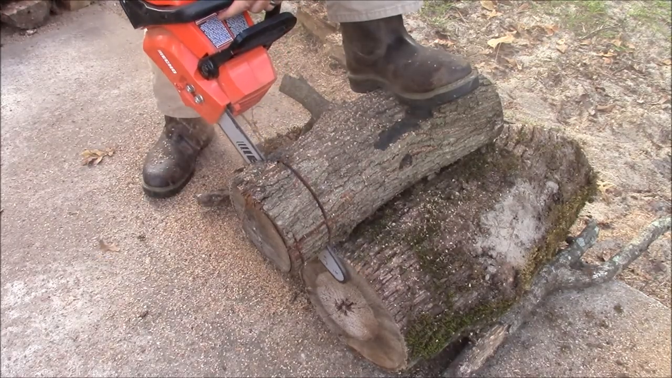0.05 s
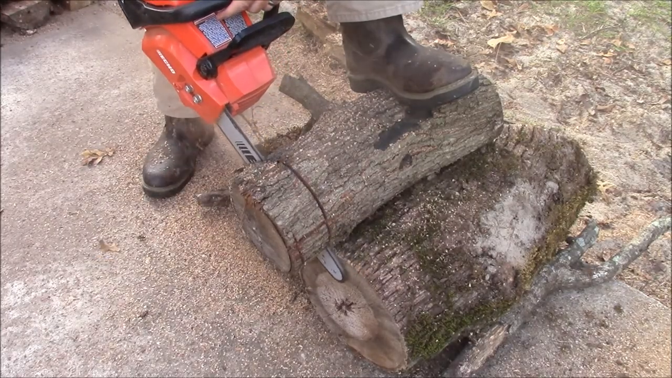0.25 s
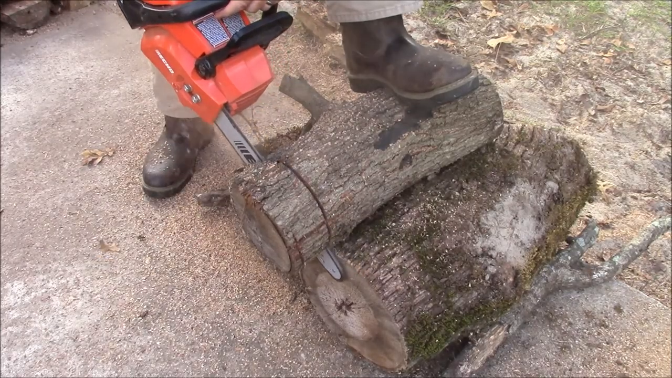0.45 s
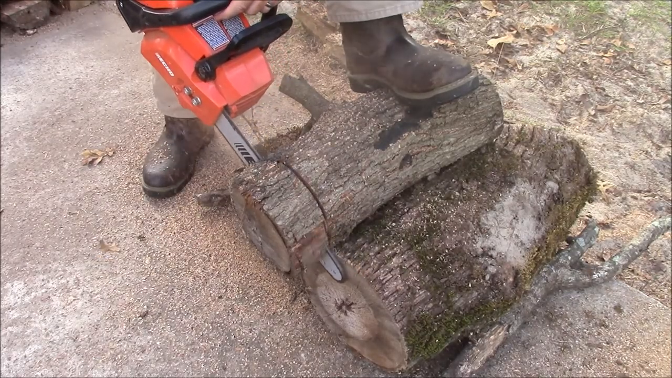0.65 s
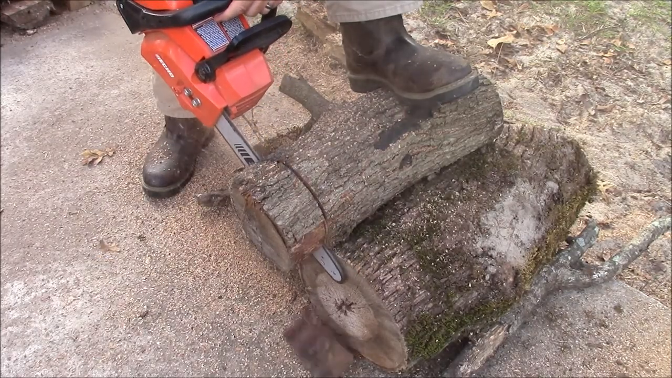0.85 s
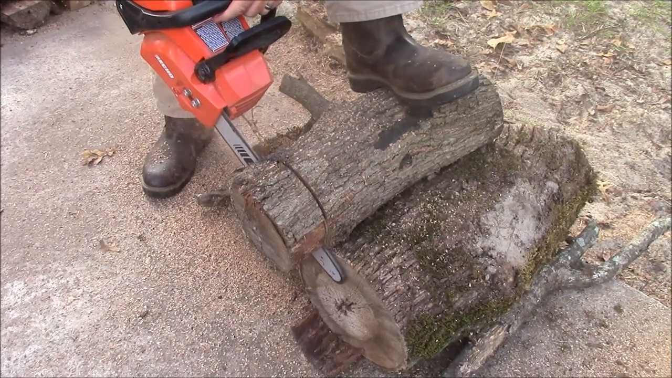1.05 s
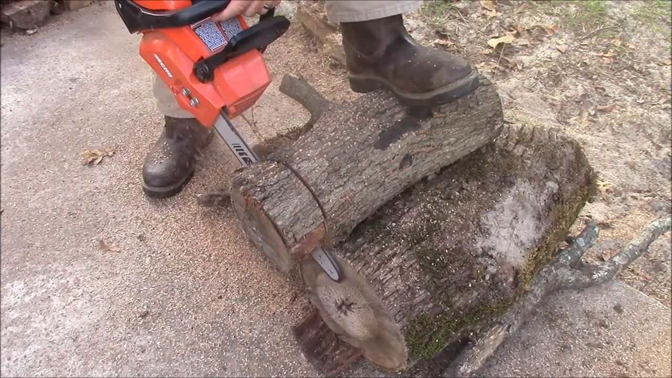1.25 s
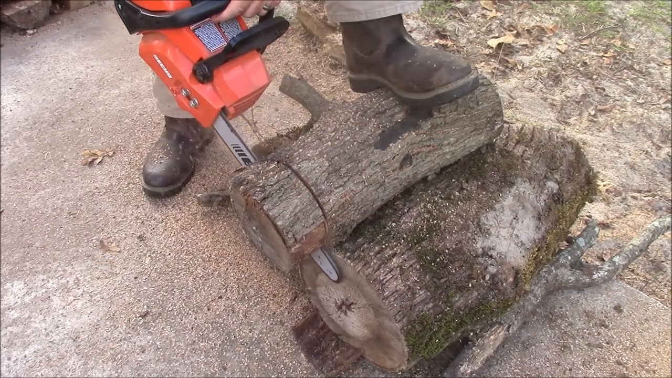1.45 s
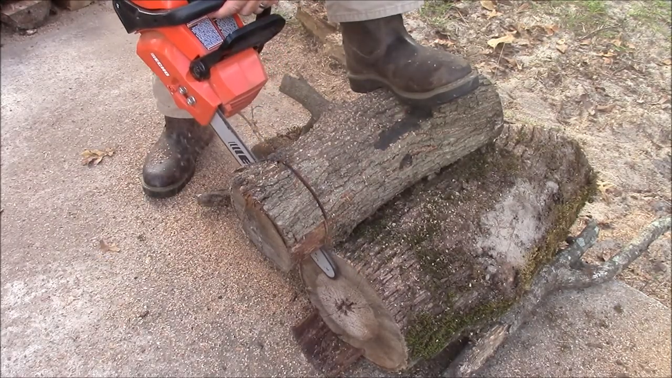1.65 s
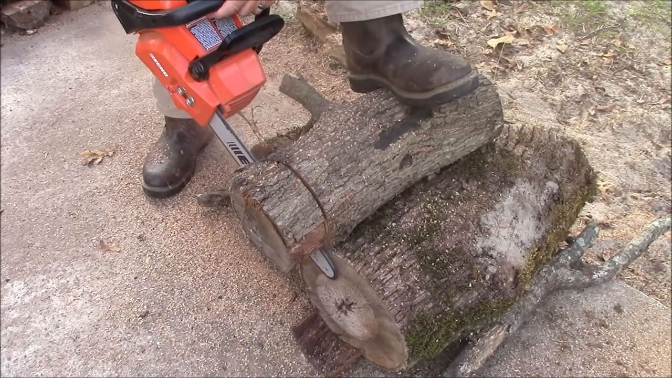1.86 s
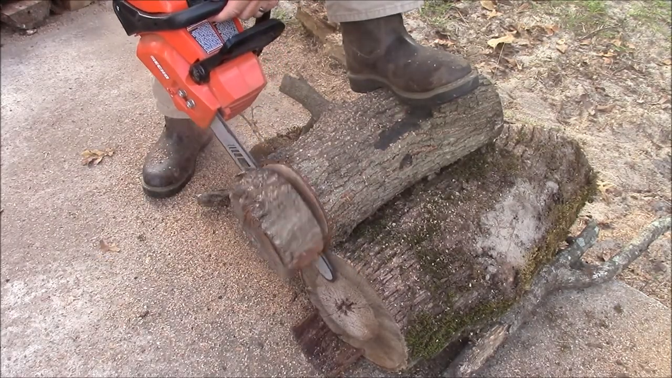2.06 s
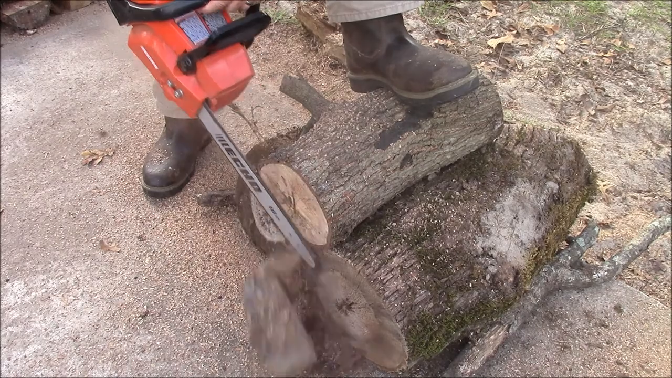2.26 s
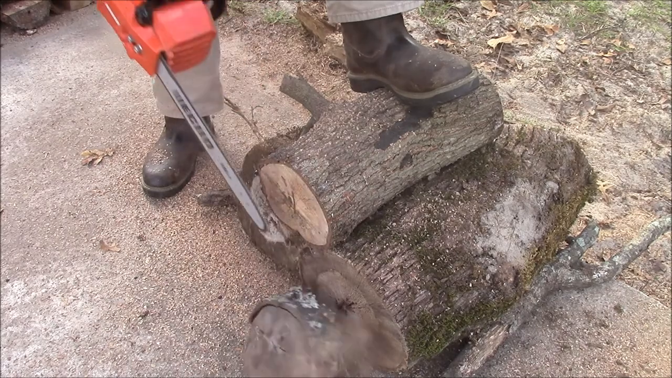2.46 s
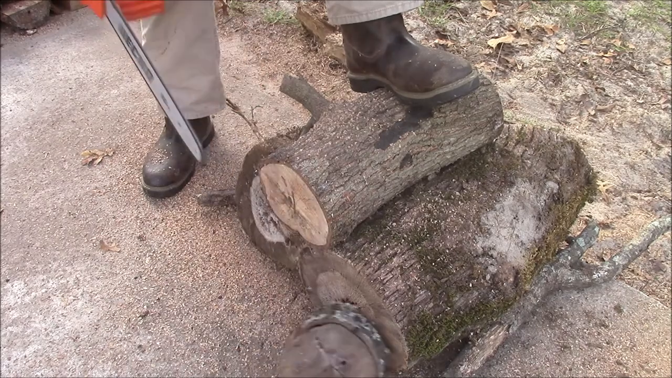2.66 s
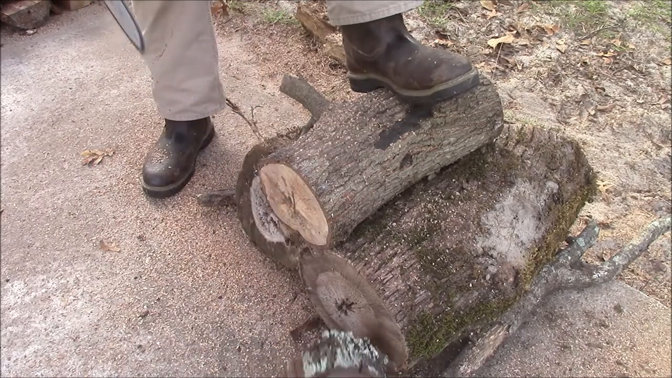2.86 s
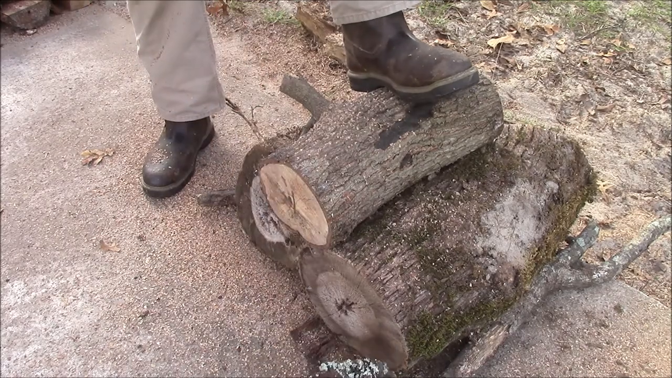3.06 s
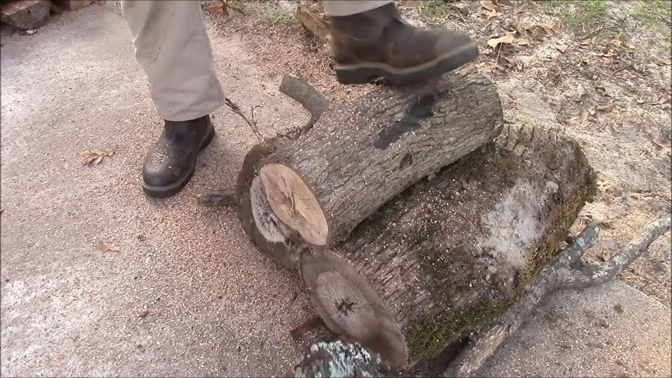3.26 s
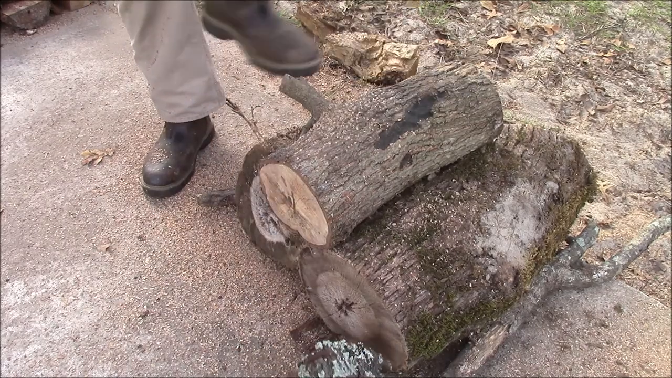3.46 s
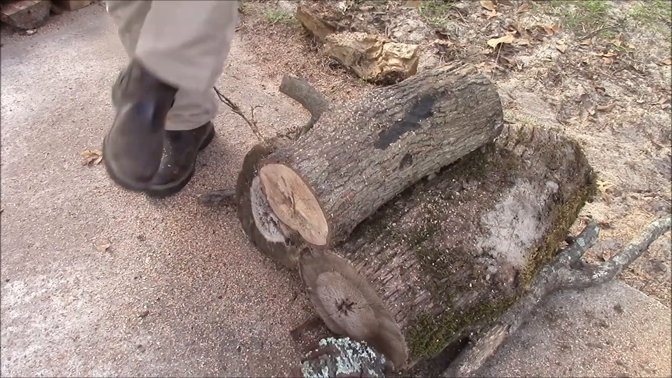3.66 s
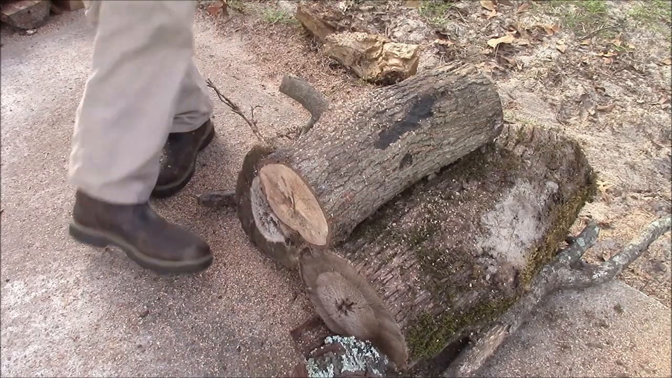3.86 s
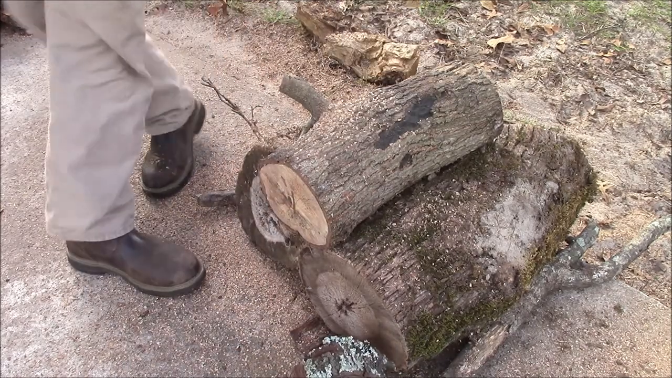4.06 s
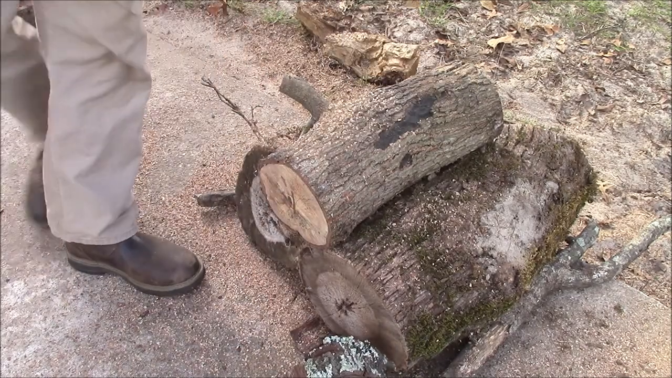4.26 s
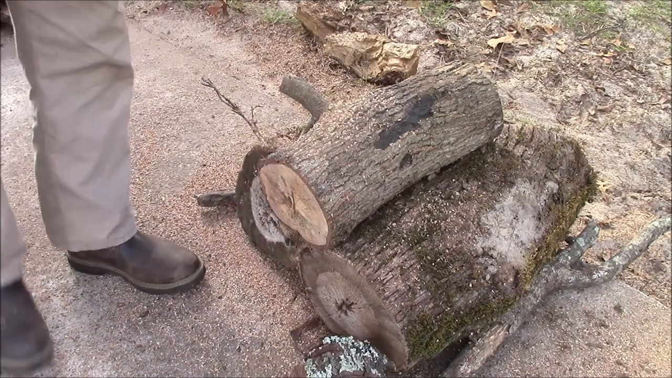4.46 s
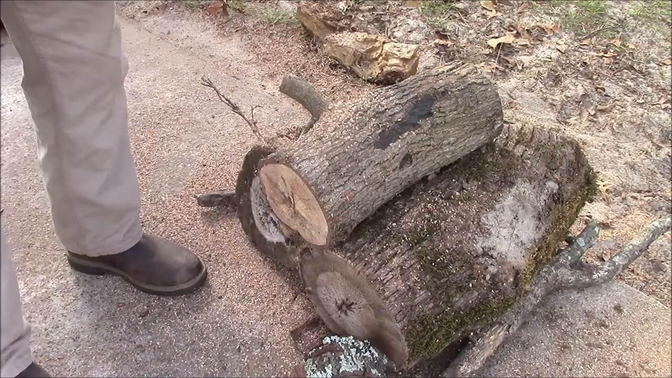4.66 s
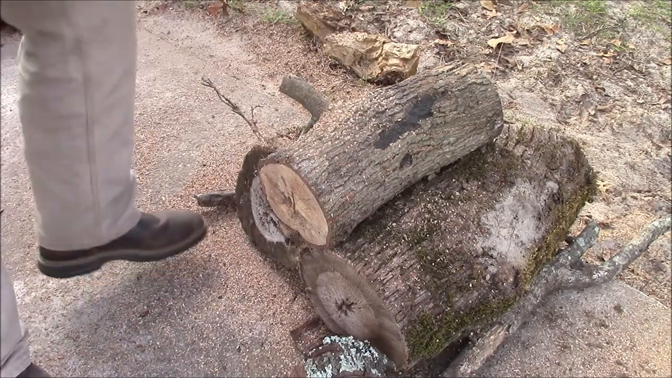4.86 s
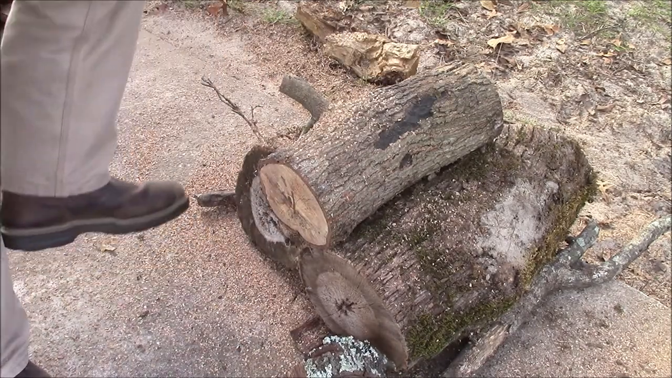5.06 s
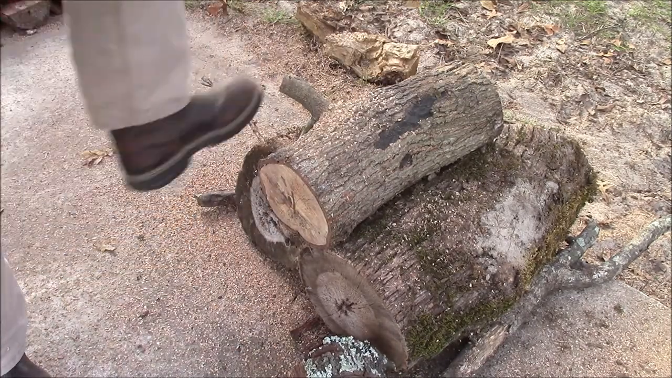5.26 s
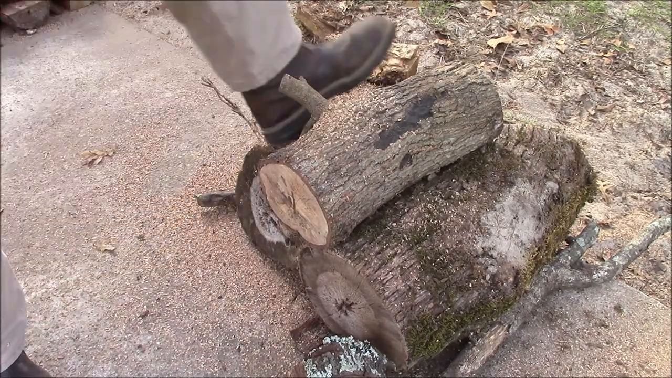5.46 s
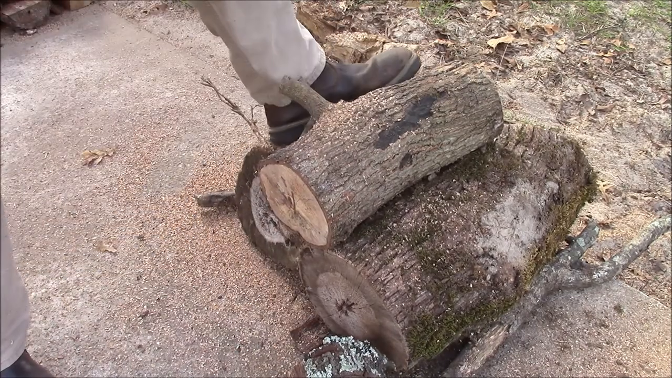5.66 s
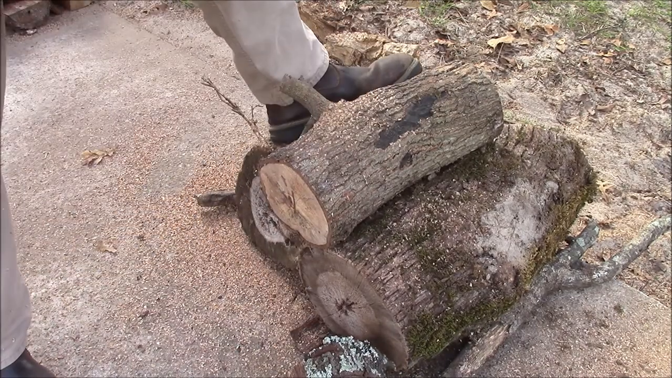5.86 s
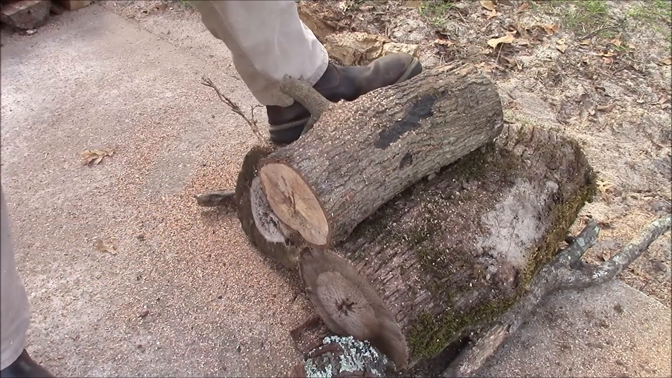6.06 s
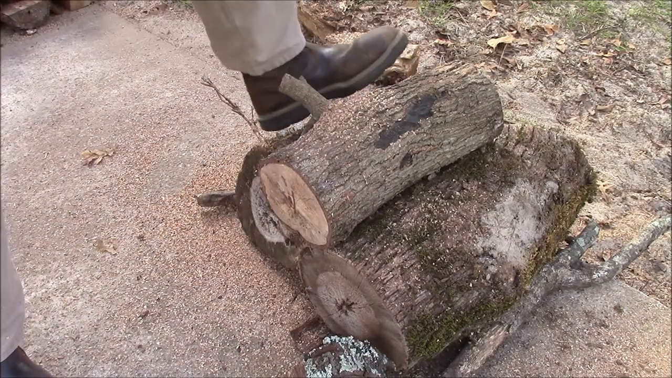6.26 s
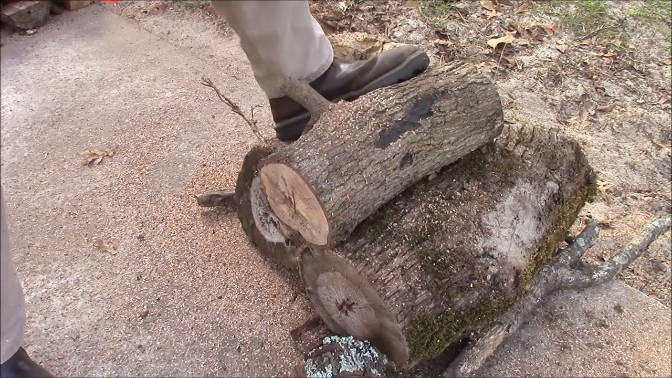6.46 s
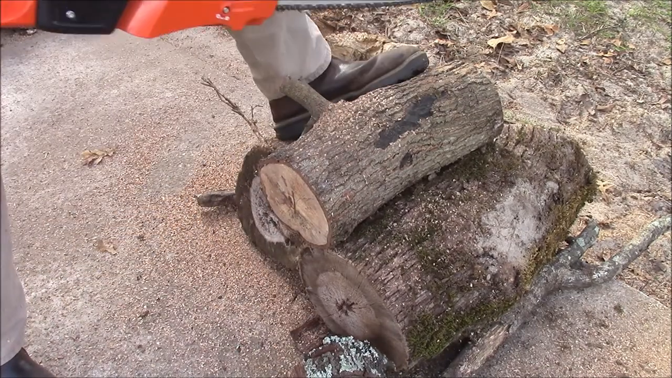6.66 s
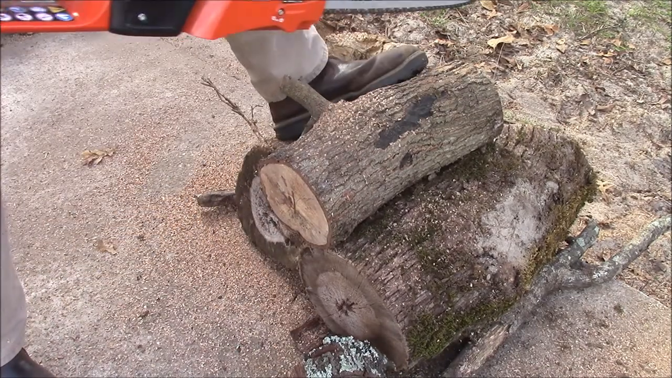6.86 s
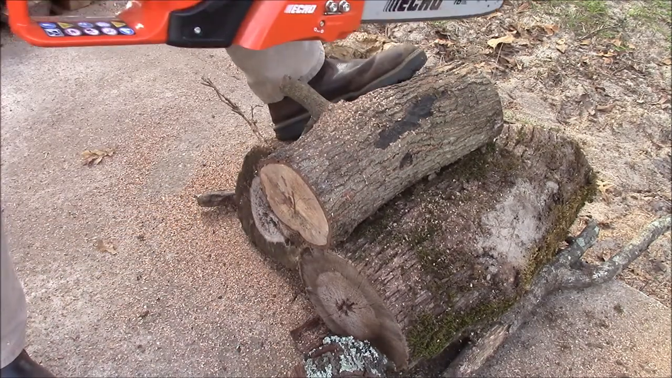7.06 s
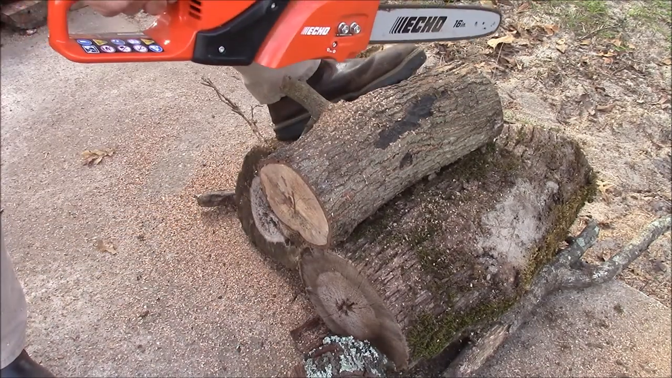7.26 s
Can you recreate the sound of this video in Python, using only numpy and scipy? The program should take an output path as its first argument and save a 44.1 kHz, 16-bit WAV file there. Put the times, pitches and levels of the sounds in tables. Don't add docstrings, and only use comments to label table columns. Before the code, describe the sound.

A battery chainsaw close to a small outdoor microphone sings with a hard electric whine and dense chain rasp, rises as the wood thins, then breaks free brighter. The pitch glides down for over two seconds until single links tick and stop. Wind thumps, twigs crack and boots scuff in the near quiet. A loud plastic click follows, then rattling links and a quickly rising whir.

```python
import sys
import numpy as np
from scipy import signal
from scipy.fft import rfft, irfft, next_fast_len
from scipy.io import wavfile
from scipy.ndimage import uniform_filter1d

SR = 44100
rng = np.random.default_rng(int(sys.argv[2]) if len(sys.argv) > 2 else 0)


def generate_wav(signal):
    frames = np.transpose(np.atleast_2d(signal))
    scaled = np.clip(frames, -1, 1) * 32767
    pcm = np.round(scaled).astype(np.int16)
    wavfile.write(sys.argv[1], SR, pcm)


def gain_from_decibels(decibels):
    exponent = np.asarray(decibels, float) / 20
    return 10 ** exponent


N = 322812

# time in seconds, speed in turns per s.
CUTTING_SPEED = [
    (0, 179),
    (.37, 180.6),
    (1.35, 179.7),
    (1.55, 184),
    (2.04, 185.1),
    (2.13, 192.5),
    (2.3, 195.3),
]
BEARING_DRAG_PER_S, FAN_DRAG = .59, .5
GRIP_S, GRIP_SHARPNESS = 3.0, 3.9
RESTART_S, PULL, PULL_GROWTH = 6.82, 200, 50

# time in seconds, level in dB.
EFFORT = [(0, -36), (.36, -34.5), (.66, -28), (2.05, -28), (2.2, -32), (2.39, -31.5), (2.46, -32.5),
          (2.7, -34), (2.79, -39), (3.26, -41), (3.42, -39), (3.75, -38), (4.45, -40.5), (4.95, -41.5),
          (5.2, -31), (6.9, -34), (7.13, -35), (7.32, -30)]
KNEE_TURNS, KNEE_POWER = 29, 4.0

# multiple of shaft speed, level in dB.
POLE_ORDERS = [(14, -1.5), (18, -3), (7, -9.5), (9, -13), (44, -8), (21, -17), (12, -17), (1, -35),
               (2, -34)]
# multiple of shaft speed, level in dB.
SPROCKET_ORDERS = [(6, 1), (5, -11), (4, -25.5), (7, -16), (11, -20)]
# multiple of shaft speed, level in dB.
OVERTONES = [(12, 1), (18, -5), (24, -1), (30, -10), (36, -11), (15, -14), (27, -10)]
# multiple of shaft speed, level in dB.
HALF_ORDERS = [(3, 0)]
# start in seconds, poles, sprocket, overtones, half orders in dB.
SONG = [(0, -3, -22, -30, -30), (.55, -6, -19, -30, -27), (.88, -6, -19, -30, -20),
        (1.55, -8, -24, -24, -23), (1.84, -6, -8, -18, -19), (2.08, -12, -1, -13, -10),
        (2.35, 1.5, -10, -18, -20), (2.425, -21, -6, -6.5, -21), (3.28, -25, -13, -18, -26),
        (3.57, -32, -10, -9, -30), (4.0, -35, -35, -28, -45), (6.0, -24, -26, -18, -35),
        (6.97, -19, -17, -9, -29)]
# frequency in Hz, level in dB.
BURIED_COLOUR = [(120, -14), (280, 0), (450, -3), (650, -1), (1150, -2), (1400, -3), (1700, 4), (2050, 4),
                 (2330, -3), (2540, 6), (2720, -4), (3250, 0), (4300, -6), (8000, 0)]
# frequency in Hz, width in Hz, level in dB.
GROUND_NOTCHES = [(455, 45, -5), (1430, 90, -9), (1845, 70, -14), (2130, 40, -6), (2240, 70, 6)]
CLEAR_S, NEAR_S = 2.44, 6.0
# frequency in Hz, level in dB.
CLEAR_COLOUR = [(280, 0), (455, -7), (650, 0), (1150, -2), (1430, -7), (1700, 6), (1845, -8), (2030, 6),
                (2300, 1), (2700, 0), (3300, -9), (8000, -12)]
# frequency in Hz, level in dB.
NEAR_COLOUR = [(150, -20), (300, -4), (650, 0), (850, -12), (1150, -2), (1500, -12), (1700, 2), (1830, -4),
               (2000, 7), (2250, -12), (2800, -8), (3150, 12), (3600, -6), (8000, -8)]
SWITCHING_HZ = 10000
# time in seconds, upper line in dB, lower line in dB.
DRIVE_WHISTLE = [
    (6.805, -90, -88),
    (6.82, -65, -64),
    (6.9, -44, -57),
    (6.97, -44, -62),
    (7.1, -43, -75),
    (7.25, -31, -75),
    (7.32, -39, -75),
]
BAR_RING_HZ = 1690
# time in seconds, level in dB.
BAR_RING = [
    (3.3, -90),
    (3.36, -36.5),
    (3.5, -46),
    (3.57, -34),
    (3.63, -90),
]

# frequency in Hz, level in dB per Hz.
IN_WOOD = [(210, -47), (350, -22), (473, -20.5), (555, -18), (620, -16), (825, -15.5), (1290, -7),
           (2110, -8), (3130, -1), (4440, -11), (6010, 1.5), (6500, -2), (7040, -1.5), (11900, -7),
           (15600, -19.5)]
# frequency in Hz, level in dB per Hz.
LIFTED = [(210, -37), (350, -8.5), (458, -19.5), (693, -2.5), (825, -9), (1440, 1), (1690, -2.5),
          (1850, -4), (3030, -5), (3790, -9), (4510, -11), (6010, -3.5), (9370, -9.5), (12300, 1.5),
          (15600, -17)]
# frequency in Hz, level in dB per Hz.
SLOWING = [(210, -35), (350, -11), (738, -4), (1290, -0.5), (1580, -6), (2630, -11), (3180, -6),
           (3610, -13), (4590, -11), (9370, -10), (11300, -7), (12700, -7), (15600, -22.5)]
# frequency in Hz, level in dB per Hz.
HELD_NEAR = [(210, -48), (350, -20), (610, -11), (738, -9), (1290, 1.5), (2350, -5.5), (2720, -11),
             (3130, -5.5), (4440, -17.5), (5820, -11), (6500, -20.5), (9670, -9), (11300, -2),
             (14400, -10.5), (15600, -26)]
# start in seconds, end in seconds, chain colour.
POSES = [
    (0, 2.76, IN_WOOD),
    (2.76, 4.08, LIFTED),
    (4.08, 5.2, SLOWING),
    (6.78, 7.4, HELD_NEAR),
]
# frequency in Hz, width in Hz, level in dB in each of the four poses.
HOUSING = [(1300, 80, -16, -18, -12, -11), (1660, 60, -17, -18, -20, -16), (2400, 60, -24, -18, -16, -12),
           (3150, 90, -17, -17, -12, -9), (4680, 70, -30, -22, -11, -30), (6050, 110, -15, -14, -18, -14),
           (7150, 150, -17, -17, -22, -22), (12180, 140, -14, -15, -16, -19),
           (12750, 60, -23, -17, -22, -20), (14250, 90, -25, -30, -30, -30)]
# start in seconds, low, high and top band in dB.
FACING = [
    (0, -5.7, 0, 2.7),
    (2.12, -5, 1.5, 5),
    (2.43, -4, 4, 6),
    (3.36, 1, 5, 5),
    (3.7, -.3, .5, 3),
    (4.15, .5, -2, -.5),
    (4.68, 7, -.5, 7),
    (6.0, 1.5, -3, 2),
    (7.17, -4, -.5, 1.5),
]
# frequency in Hz, side against mid in dB.
STEREO_WIDTH = [(60, -25), (110, -38), (200, -58), (380, -57), (700, -46), (1290, -43.5), (2380, -38),
                (4400, -25.5), (8120, -15), (15000, -12.5)]

# time in seconds, frequency in Hz, level in dB.
KERF = [
    (1.92, 3450, -52),
    (2.1, 3150, -36),
    (2.34, 2800, -34.5),
    (2.44, 2680, -52),
]
# time in seconds, frequency in Hz, level in dB.
COVER_GLIDE = [(3.3, 1460, -60), (3.38, 1470, -44), (3.55, 1500, -48), (3.75, 1460, -44), (3.97, 1470, -45),
               (4.2, 1350, -49), (4.43, 1230, -50), (4.6, 1250, -62)]
# time in seconds, frequency in Hz, level in dB.
BAR_GLIDE = [(3.3, 3120, -62), (3.5, 3130, -50), (3.85, 3030, -47), (4.1, 3170, -49), (4.35, 3220, -49),
             (4.55, 3200, -56), (4.7, 3100, -65)]
KERF_WIDTH_HZ, SWING_WIDTH_HZ = 130, 30

# time in seconds, peak in dB, low band against it in dB.
LAST_LINKS = [(4.5618, -31, -6), (4.5833, -31, -11), (4.5907, -32, -7), (4.5987, -26, -9),
              (4.693, -28, -10), (4.7359, -36, -6), (4.7359, -26, -8), (4.7663, -27, -15),
              (4.7913, -32, -7), (4.8057, -27, -12), (4.8701, -29, -12), (4.8935, -32, -5), (4.914, -45, 2),
              (4.914, -27, -12), (4.9644, -30, -18), (4.9948, -36, -17), (5.0053, -37, -14),
              (5.0153, -37, -14), (5.0213, -32, -13), (5.0397, -34, -11), (5.0602, -31, -9),
              (5.0851, -36, -4), (5.0941, -33, -7), (5.138, -36, -17), (5.15, -33, -18), (5.1694, -38, -7),
              (5.1994, -38, -11), (5.1994, -32, -17)]
# time in seconds, peak in dB, low band against it in dB.
FIRST_LINKS = [
    (6.8463, -33, -2),
    (6.8624, -35, 0),
    (6.8912, -28, 0),
]
# time in seconds, peak in dB, top band against it in dB, t60 in seconds.
SNAPS = [(5.19, -39, -6, 0.03), (5.34, -45, -18, 0.03), (5.469, -45, -10, 0.03), (5.496, -36, -2, 0.03),
         (5.519, -43, -9, 0.03), (5.557, -44, -12, 0.03), (5.565, -43, -16, 0.039), (5.549, -52, 6, 0.02),
         (5.903, -56, 2, 0.02), (6.105, -52, -3, 0.02), (6.175, -60, 10, 0.02), (5.607, -28, -9.5, 0.03),
         (5.646, -35, -17, 0.052), (5.924, -49, -8, 0.039), (5.944, -46, -17, 0.03),
         (6.272, -50, -19, 0.03), (6.679, -43, -7, 0.03)]
# time in seconds, peak in dB, t60 in seconds.
KNOCKS = [(4.468, -29, 0.072), (4.51, -33, 0.09), (4.6134, -30, 0.076), (4.6828, -30.5, 0.09),
          (4.7416, -31, 0.09), (4.816, -35, 0.09), (4.9024, -34.5, 0.11), (4.9427, -35, 0.09),
          (5.0529, -43.5, 0.1), (5.0836, -36, 0.094), (6.8246, -38, 0.076), (6.8844, -28, 0.083)]
# time in seconds, peak in dB, frequency in Hz,
# seconds to fall 10 dB.
PINGS = [
    (6.832, -44, 680, .015),
    (6.89, -38, 1630, .02),
    (6.985, -34, 1420, .025),
    (7.03, -30, 2400, .025),
    (7.075, -36, 1330, .015),
    (7.14, -35, 2420, .025),
    (7.21, -33, 3150, .04),
]
LOCK_S, LOCK_DB = 6.6528, -10.5
# frequency in Hz, width in Hz, level in dB.
LOCK_PLASTIC = [(1310, 600, -10), (1900, 400, 1), (3130, 510, 7), (3720, 350, -3), (5130, 440, 7),
                (7000, 1100, -10), (9400, 2700, -19), (12500, 2000, -17)]

# time in seconds, level in dB.
BREEZE = [(0, -68), (.7, -63), (2.85, -63), (3.05, -55), (4.2, -48), (4.95, -51), (5.3, -62), (6.65, -72),
          (6.9, -58), (7.32, -59)]
# time in seconds, peak in dB, seconds to fall 10 dB.
SWELLS = [(2.22, -46, .04), (2.38, -49, .1), (3.42, -43, .08), (3.575, -38, .03), (4.4, -43, .12),
          (4.71, -40, .025), (4.87, -41, .11), (5.06, -40, .045), (5.285, -54, .03), (5.49, -52, .2),
          (5.695, -42, .025), (5.77, -47, .05), (5.92, -49, .1), (6.28, -43, .12), (6.09, -51, .06),
          (6.48, -54, .08), (6.57, -57, .04), (6.745, -41, .05), (7.05, -49, .08), (0, -55, .1),
          (6.89, -42, .07)]
RISE_SHARE = .6
# time in
# seconds, peak in dB, frequency in Hz, t60 in seconds.
THUMPS = [(2.221, -23.5, 587, 0.04), (3.439, -42, 619, 0.04), (3.567, -28.5, 364, 0.04),
          (4.309, -38, 694, 0.04), (4.698, -26.5, 301, 0.044), (5.054, -40, 310, 0.044),
          (5.382, -34, 264, 0.024), (5.682, -31, 450, 0.058), (5.834, -36, 230, 0.044),
          (5.918, -33, 240, 0.035), (5.963, -30, 231, 0.034), (6.022, -37, 291, 0.063),
          (6.277, -32, 256, 0.035), (6.29, -34, 283, 0.043), (6.389, -39, 210, 0.05),
          (6.724, -36, 520, 0.03), (6.762, -37, 560, 0.03), (6.268, -39, 650, 0.03),
          (6.761, -33, 260, 0.048), (6.761, -44, 1100, 0.025), (6.724, -47, 950, 0.025),
          (6.718, -36, 275, 0.05), (6.79, -40, 330, 0.05), (5.839, -47, 620, 0.025)]
# time in seconds, peak in dB, frequency in Hz.
TAPS = [(5.165, -43, 260), (5.214, -42, 330), (5.272, -44, 230), (5.298, -46, 260), (5.326, -49, 258),
        (5.352, -48, 220), (5.447, -44, 230), (5.475, -43, 330), (5.532, -44, 315), (5.628, -44, 220),
        (5.70, -38, 300), (5.751, -41, 330), (5.767, -38, 245), (5.797, -43, 280), (5.888, -38, 266),
        (5.978, -41, 260), (6.149, -49, 248), (6.184, -41, 299), (6.224, -37, 261), (6.351, -40, 205),
        (6.423, -47, 194), (6.534, -48, 330), (6.567, -46, 215), (6.59, -48, 260)]
TAP_T60_S, TAP_SWIRL = .036, .45
# time in seconds, level in dB.
RUMBLE = [(0, -88), (1.8, -86), (2.2, -77), (2.9, -84), (3.6, -74), (5.7, -69), (6.6, -72), (7.0, -82)]
# frequency in Hz, level in dB per Hz.
AIR = [(290, -23), (500, -8.5), (667, -11), (1100, -12.5), (3110, -11), (4090, -11.5), (4460, -10.5),
       (6480, -20.5), (11000, -24.5), (15600, -33.5)]
AIR_DB, AIR_LOW_DB, AIR_HIGH_DB = -74, -3, -4
# time in seconds, peak in dB, seconds to fall 10 dB.
SCUFFS = [
    (5.25, -63, .25),
    (5.51, -59, .12),
    (6.11, -62, .12),
    (6.5, -65.5, .7),
]


def shaft():
    t = np.arange(N) / SR
    free = np.maximum(t - CUTTING_SPEED[-1][0], 0)
    again = np.maximum(t - RESTART_S, 0)
    left = np.exp(-BEARING_DRAG_PER_S * free)
    grip = 1 - np.minimum(free / GRIP_S, 1) ** GRIP_SHARPNESS
    coast = left / (1 + FAN_DRAG * (1 - left)) * grip
    return np.maximum(in_time(CUTTING_SPEED)[0] * coast + PULL * again + PULL_GROWTH * again ** 2, 1)


def clatter_db(turns):
    return in_time(EFFORT)[0] - 10 * np.log10(1 + (KNEE_TURNS / turns) ** KNEE_POWER)


def housing_db(hz):
    t = np.linspace(0, N / SR, len(hz))
    notches = sum(db * np.exp(-((hz - centre_hz) / width) ** 2) for centre_hz, width, db in GROUND_NOTCHES)
    buried = at_hz(BURIED_COLOUR, hz) + notches
    moved = np.where(t < NEAR_S, at_hz(CLEAR_COLOUR, hz), at_hz(NEAR_COLOUR, hz))
    return np.where(t < CLEAR_S, buried, moved)


def motor(turns):
    angle = 2 * np.pi * np.cumsum(turns * wobble(25, .008)) / SR
    t = np.arange(N) / SR
    out = gain_from_decibels(in_time(BAR_RING)[0]) * np.sin(2 * np.pi * BAR_RING_HZ * t)
    families = (POLE_ORDERS, SPROCKET_ORDERS, OVERTONES, HALF_ORDERS)
    levels_db = clatter_db(turns) + by_stage(SONG, blend_s=.06)
    for orders, level_db in zip(families, levels_db):
        for multiple, db in orders:
            gain = gain_from_decibels(level_db[::64] + db + 3 + housing_db(multiple * turns[::64]))
            line = np.sin(round(multiple) * angle + rng.uniform(0, 7))
            out += np.interp(t, t[::64], gain) * wobble(10.0, 1.5) * line
    carrier = 2 * np.pi * SWITCHING_HZ * t
    upper_db, lower_db = in_time(DRIVE_WHISTLE)
    upper = gain_from_decibels(upper_db) * np.sin(carrier + 14 * angle)
    lower = gain_from_decibels(lower_db) * np.sin(carrier - 14 * angle)
    return out + upper + lower


def link_strikes(turns):
    links = np.floor(np.cumsum(6 * turns * wobble(150, 1.2)) / SR)
    force_db = 5.0 * (links % 2) + 2.0 * (links % 6 == 1) + 2.0 * rng.standard_normal(N)
    strikes = (np.diff(links, prepend=0) > 0) * gain_from_decibels(force_db)
    gate = signal.lfilter([1], [1, -gain_from_decibels(-60 / (0.019 * SR))], strikes)
    gate = gate / (uniform_filter1d(gate, 4000) + 1e-9) + 1.24
    return gate / np.sqrt(uniform_filter1d(gate ** 2, 4000))


def chain(turns):
    gate, t = link_strikes(turns), np.arange(N) / SR
    edges = (1900, 4500, 9000)
    groups = np.zeros((4, 2, N))
    for pose, (start_s, end_s, colour) in enumerate(POSES):
        part = slice(max(round((start_s - .05) * SR), 0), round((end_s + .05) * SR))
        inside_s = np.minimum(t[part] - start_s + (start_s == 0), end_s - t[part])
        blend = np.sqrt(np.clip(.5 + inside_s / .1, 0, 1))
        sound = coloured(gate[part], colour, edges, patchy_db=1.0)
        rattle = gate[part] * rng.standard_normal(len(blend))
        for hz, width, *pose_db in HOUSING:
            ring = rms_one(resonance(resonance(rattle, hz, width), hz, width))
            flicker = wobble(5.0, 2.5, count=len(blend))
            sound[np.searchsorted(edges, hz)] += ring * gain_from_decibels(pose_db[pose]) * flicker
        groups[:, :, part] += blend * sound
    level_db = clatter_db(turns)
    low_db, high_db, top_db = by_stage(FACING, blend_s=.15)
    return sum(g * gain_from_decibels(level_db + db) for g, db in zip(groups, (low_db, 0, high_db, top_db)))


def gliding(track, width_hz):
    part = slice(round(track[0][0] * SR), round(track[-1][0] * SR))
    hz, db = (c[part] for c in in_time(track))
    r = np.exp(-2 * np.pi * width_hz / SR)
    rough = signal.lfilter([1], [1, -2 * r, r * r], rng.standard_normal((2, len(hz))))
    angle, out = 2 * np.pi * np.cumsum(hz) / SR, np.zeros(N)
    out[part] = gain_from_decibels(db) * rms_one(rough[0] * np.sin(angle) + rough[1] * np.cos(angle))
    return out


def clicks():
    white, out = rng.standard_normal(N + 4000), np.zeros(N + 4000)
    low, high = band(white, 700, 3900), band(white, 5500, 14500)
    rows = [(s, db + rel_db - 5, db - 2.5, .02) for s, db, rel_db in LAST_LINKS + FIRST_LINKS]
    rows += [(s, db, db + rel_db, t60) for s, db, rel_db, t60 in SNAPS]
    for s, low_db, high_db, t60 in rows:
        for sound, db in ((low, low_db), (high, high_db)):
            start, piece = burst(s, t60, sound)
            out[start:start + 4000] += gain_from_decibels(db) * piece * np.minimum(np.arange(4000) / 40, 1)
    return out[:N]


def knocks():
    cover, out = band(rng.standard_normal(N + 4000), 890, 1650), np.zeros(N + 4000)
    for s, db, t60 in KNOCKS:
        start, piece = burst(s, t60, cover)
        out[start:start + 4000] += gain_from_decibels(db + 3.5) * piece * np.minimum(np.arange(4000) / 150, 1)
    return out[:N]


def pings():
    t, out = np.arange(N) / SR, np.zeros(N)
    for s, db, hz, fall_s in PINGS:
        part = slice(round((s - .1) * SR), round((s + .2) * SR))
        after = t[part] - s
        level_db = db - 10 * np.maximum(after, -after / RISE_SHARE) / fall_s
        out[part] += gain_from_decibels(level_db) * np.sin(2 * np.pi * hz * after)
    return out


def lock():
    after = np.arange(N) / SR - LOCK_S
    onset = np.clip(1 + after / .0015, 0, 1) ** 2
    decay = gain_from_decibels(-60 * np.abs(after) / 0.015) + gain_from_decibels(-21 - 60 * np.abs(after) / 0.087)
    crack = rng.standard_normal(N) * onset * decay + 1e-18
    body = sum(gain_from_decibels(db) * resonance(crack, hz, width) / np.sqrt(width) for hz, width, db in LOCK_PLASTIC)
    tick = gain_from_decibels(-57) * np.sin(2 * np.pi * 900 * after) * np.exp(-((after + .026) / .004) ** 2)
    return gain_from_decibels(LOCK_DB) * body / np.abs(body).max() + tick


def wind():
    level_db = swollen(in_time(BREEZE)[0], SWELLS, RISE_SHARE)
    push_size = gain_from_decibels(3.5 * np.minimum(rng.exponential(1, N), 2.5))
    pushes = (rng.random(N) < 240 / SR) * push_size * rng.choice([-1, 1], N)
    lumps = band(pushes + 0.009 * rng.standard_normal(N), 125, 580, order=3)
    swirl = rms_one(band(rng.standard_normal(N + 4000), 90, 620, order=3))
    out = np.zeros(N + 4000)
    out[:N] = gain_from_decibels(level_db - 2.5) * rms_one(lumps + 1.3 * resonance(lumps, 300, 90))
    soft_push = np.sin(np.minimum(np.arange(4000) / 110, np.pi / 2)) ** 2 * 1.9
    for s, db, hz, t60 in THUMPS + [(*tap, TAP_T60_S) for tap in TAPS]:
        tone = np.sin(2 * np.pi * hz * np.arange(4000) / SR)
        start, piece = burst(s, t60, tone + TAP_SWIRL * swirl[round(s * SR):][:4000], offset=0)
        out[start:start + 4000] += gain_from_decibels(db - 1.5) * piece * soft_push
    rumble = rms_one(band(rng.standard_normal(N), 30, 140)) * wobble(9.0, 5.0)
    return band(out[:N], 90, 3000) + gain_from_decibels(in_time(RUMBLE)[0]) * rumble


def ground():
    quiet = slice(round(4.6 * SR), N)
    grains = (rng.random(N) < 200 / SR) * rng.exponential(1, N)
    grit = 1 + .15 * signal.lfilter([1], [1, -.99], grains)
    level_db = swollen(AIR_DB, SCUFFS, rise_share=1.7)
    bands_db = level_db + [[AIR_LOW_DB], [0], [AIR_HIGH_DB]]
    groups = coloured(grit[quiet], AIR, (2500, 5500), patchy_db=1.0)
    out = np.zeros((2, N))
    out[:, quiet] = sum(g * gain_from_decibels(db[quiet]) for g, db in zip(groups, bands_db))
    return out


def coloured(gate, spectrum, edges, patchy_db):
    size = next_fast_len(len(gate), real=True)
    hz = np.maximum(np.arange(size // 2 + 1) * SR / size, 1)
    white = rng.standard_normal((2, len(gate)))
    sharp = 1 / (1 + (6000 / hz) ** 4)
    strikes = sharp * rfft(white * gate, size) + (1 - sharp) * rfft(white * gate ** 0.35, size)
    mid, side = strikes * gain_from_decibels(at_hz(spectrum, hz))
    pair = mid + side * gain_from_decibels(at_hz(STEREO_WIDTH, hz)) * [[1], [-1]]
    groups = np.zeros((len(edges) + 1, 2, len(gate)))
    for centre in 340 * 2 ** np.arange(0, 5.8, .4):
        share = np.cos(np.pi / 2 * np.clip(2.5 * np.log2(hz / centre), -1, 1)) ** 2
        patch = irfft(pair * share, size)[:, :len(gate)]
        groups[np.searchsorted(edges, centre)] += patch * wobble(9.3, patchy_db, count=len(gate))
    return np.array([rms_one(g) for g in groups])


def burst(at_s, t60, sound, offset=None):
    start = round(at_s * SR)
    decay = gain_from_decibels(-60 * np.arange(4000) / SR / max(t60, .004))
    piece = sound[start if offset is None else offset:][:4000] * decay
    return start, piece / np.abs(piece).max()


def swollen(base_db, swells, rise_share):
    t, power = np.arange(0, N, 32) / SR, 0
    for s, db, fall_s in swells:
        drop_db = 10 * np.maximum(t - s, (s - t) / rise_share) / fall_s
        power = power + gain_from_decibels(2 * np.maximum(db - drop_db, -150))
    return 10 * np.log10(gain_from_decibels(2 * base_db) + np.interp(np.arange(N) / SR, t, power))


def wobble(rate, depth_db, count=N):
    r = np.exp(-128 * np.pi * rate / SR)
    slow = signal.lfilter([1], [1, -2 * r, r * r], rng.standard_normal(count // 64 + 1002))[1000:]
    return np.interp(np.arange(count) / 64, np.arange(len(slow)), gain_from_decibels(depth_db * rms_one(slow)))


def by_stage(rows, blend_s):
    s, *columns = np.transpose(rows)
    stage = np.maximum(np.searchsorted(s, np.arange(N) / SR, "right") - 1, 0)
    return [uniform_filter1d(c[stage], round(blend_s * SR)) for c in columns]


def in_time(rows):
    s, *columns = np.transpose(rows)
    return [np.interp(np.arange(N) / SR, s, c) for c in columns]


def at_hz(points, hz):
    return np.interp(np.log(hz), np.log(np.array(points)[:, 0]), np.array(points)[:, 1])


def band(x, low_hz, high_hz, order=2):
    edges = [low_hz, min(high_hz, SR / 2.1)]
    return signal.sosfilt(signal.butter(order, edges, "band", fs=SR, output="sos"), x)


def resonance(x, hz, width):
    r = np.exp(-np.pi * width / SR)
    poles = [1, -2 * r * np.cos(2 * np.pi * hz / SR), r * r]
    return signal.lfilter(np.array([1, 0, -1]) * (1 - r * r) / 2, poles, x)


def rms_one(x):
    return x / np.sqrt(np.mean(x ** 2) + 1e-20)


def scene():
    turns = shaft()
    hard = clicks() + knocks() + lock() + pings()
    echo = np.pad(hard, (round(.004 * SR), 0))[:N] * gain_from_decibels(-12)
    rings = gliding(KERF, KERF_WIDTH_HZ) + gliding(COVER_GLIDE, SWING_WIDTH_HZ)
    rings += gliding(BAR_GLIDE, SWING_WIDTH_HZ)
    return motor(turns) + hard + echo + chain(turns) + wind() + ground() + rings


def roll_off(x):
    return signal.sosfilt(signal.butter(12, 15730, fs=SR, output="sos"), x)


def record(dry):
    cut = signal.sosfilt(signal.butter(2, 90, "high", fs=SR, output="sos"), dry)
    cut = signal.sosfilt(signal.ellip(8, .5, 60, 15600, fs=SR, output="sos"), cut)
    return roll_off(cut)


dry = scene()
out = record(dry)
generate_wav(out)
```